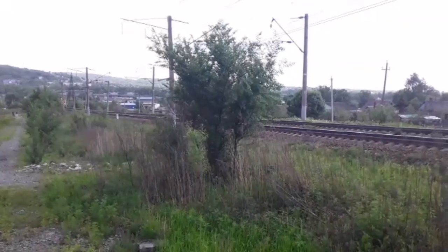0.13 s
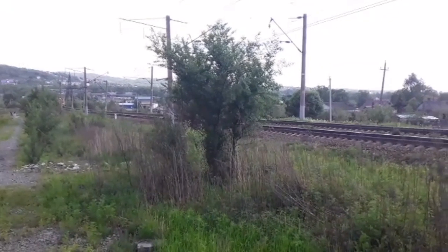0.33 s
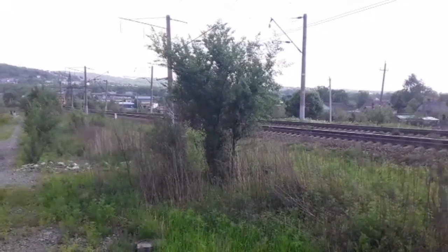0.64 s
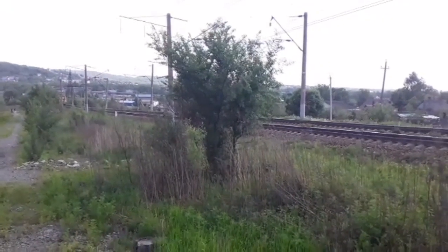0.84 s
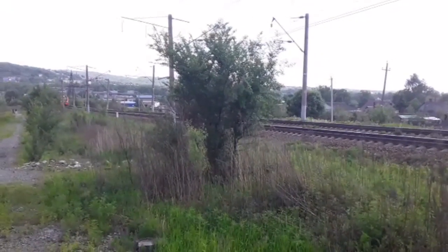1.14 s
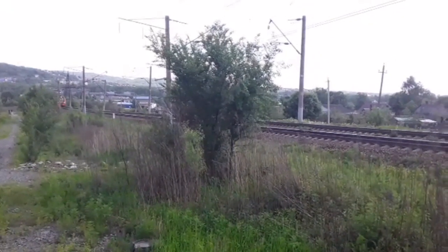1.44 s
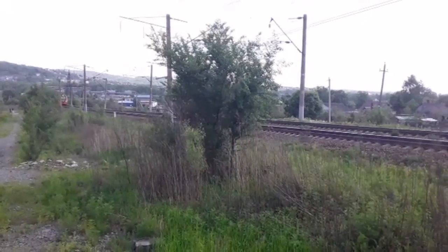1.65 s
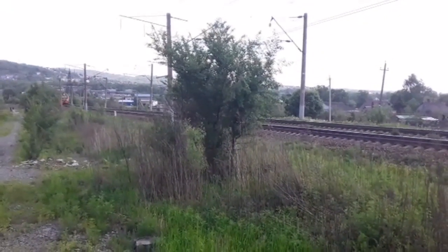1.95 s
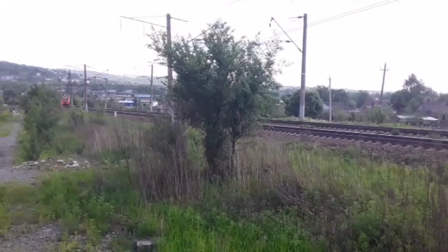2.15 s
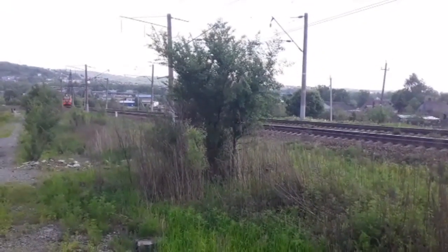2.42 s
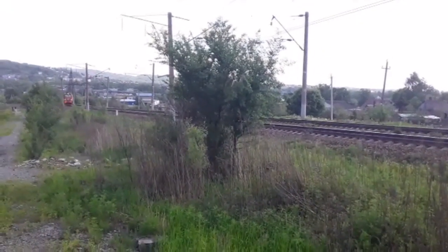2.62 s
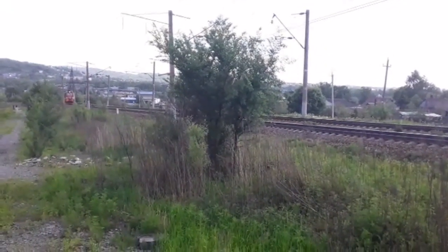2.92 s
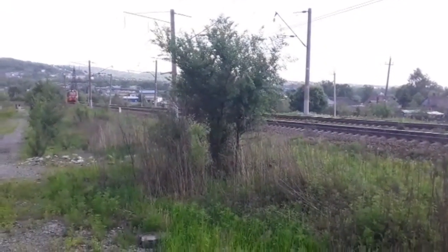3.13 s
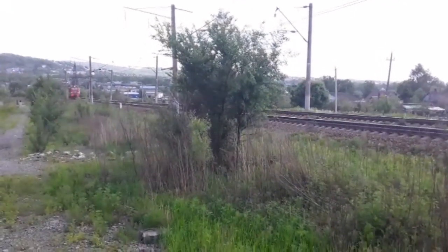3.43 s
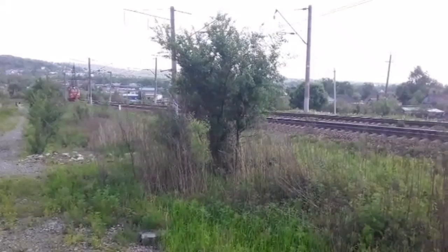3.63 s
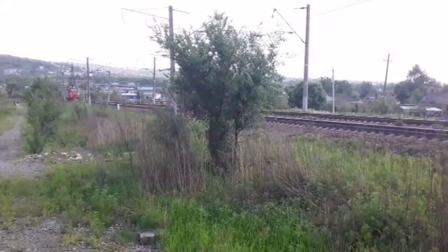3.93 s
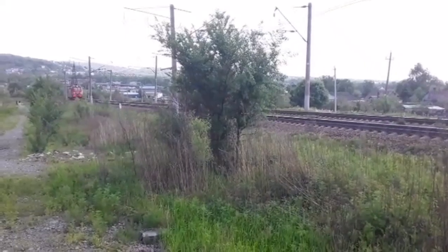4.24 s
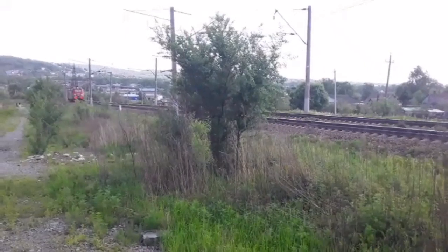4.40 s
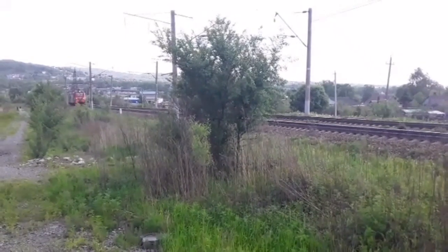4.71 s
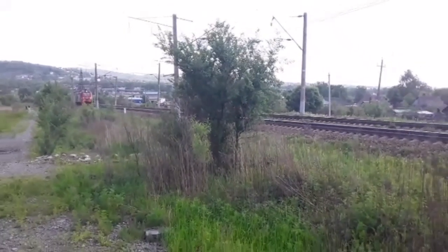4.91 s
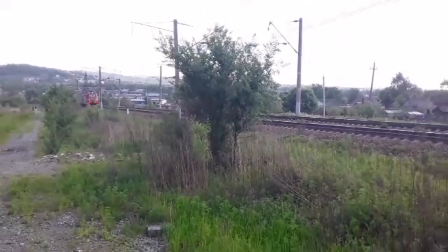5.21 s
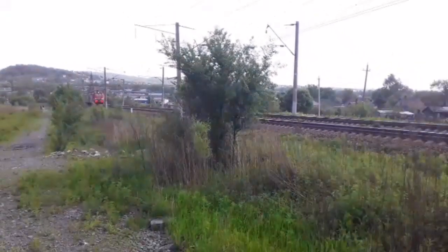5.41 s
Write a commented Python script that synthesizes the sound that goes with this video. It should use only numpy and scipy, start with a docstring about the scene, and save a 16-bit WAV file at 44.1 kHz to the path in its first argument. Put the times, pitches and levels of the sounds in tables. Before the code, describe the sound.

A steady low rumble of distant traffic and a faint chorus of far birds run throughout, in an open outdoor space. For the first second, a small bird gives quick, high twitters. From about 1 to 3 seconds, short high trills mix with nasal chips, hoarse little rasps and falling whistles. A rapid run of piping notes follows from 3 to 3.7 seconds, then thin, sharp chirps crowd together and grow louder until about 5.2 seconds. A few soft low bumps come and go on the microphone. The handheld camera's body gives a sharp, close click at about 4.7 seconds and a louder one at 5 seconds, both standing well above the birds. Two lower trills finish at around 5.3 to 5.5 seconds, with a faint, brief wavering tone far away.

```python
"""Quick, high twitters are heard first, over a far chorus and the rumble of a distant town. Small songbirds
in bushes beside an open railway line go on with rasps, trills, nasal chips, whistles and piping notes.
Each voice is a tone, or a stack of harmonics, modulated in frequency and amplitude and reflected by ground
and scrub; the traffic is broadband noise. The body of a hand-held camera ticks in damped modes, soft low
bumps come and go, and a faint far tone sounds near the end."""
import sys
import numpy as np
from scipy import signal
from scipy.fft import rfft, irfft
from scipy.io import wavfile
from scipy.ndimage import map_coordinates

SR = 44100
rng = np.random.default_rng(int(sys.argv[2]) if len(sys.argv) > 2 else 0)


def file_out(sig):
    """Save sig as 16-bit WAV at sys.argv[1]."""
    # one column per channel
    cols = np.atleast_2d(sig).T
    # limit, then scale
    lim = np.clip(cols, -1, 1)
    pcm = np.round(lim * 32767).astype(np.int16)
    wavfile.write(sys.argv[1], SR, pcm)


N = 245195

# traffic spectrum: f/Hz, relative spectral density/dB
TRAFFIC_SPECTRUM = [(15, -55), (30, -14.5), (60, -6), (87, 2), (187, -6.5), (304, -4), (546, -10),
                    (820, -5), (1200, -8.5), (2220, -17), (3500, -20.5), (5200, -25), (6500, -34.5),
                    (8550, -42), (11000, -50), (12500, -58)]
# traffic swell: t/s, level/dB
TRAFFIC_SWELL = [(0.0, -49), (2.01, -47), (2.68, -47), (3.36, -46.5), (3.83, -48), (4.69, -47),
                 (5.06, -46.5), (5.26, -47), (5.56, -46.5)]
# far machinery: f/Hz, level/dB, bandwidth/Hz
MACHINE_HUMS = [(620.8, -63.5, 12), (84, -60.5, 21)]
# twitters: t/s, rise/ms, shoulder f/Hz, arch/ms, top f/Hz, rise level/dB, drop level/dB
TWITTER_NOTES = [(0.0163, 8.8, 4970, 8, 7200, -44.5, -54), (.049, 13.4, 4820, 5.9, 6700, -40, -46),
                 (.130, 8.1, 5050, 7.4, 6900, -43, -51), (.162, 12, 4880, 9, 6500, -41.5, -46.5),
                 (.193, 8, 5200, 6, 6500, -60, -62), (0.253, 9.2, 4750, 6.8, 7200, -43, -53),
                 (.285, 14, 4820, 4.5, 6200, -40.5, -45), (.367, 8, 5180, 7.5, 6600, -40, -45),
                 (.400, 13.7, 4720, 5.4, 6500, -36.5, -47), (.480, 8, 5020, 6.8, 6800, -37.5, -43),
                 (0.5119, 15.3, 4730, 5.4, 6300, -37.5, -47), (.576, 6.5, 5000, 6, 6200, -56, -60),
                 (.602, 9, 5080, 8.6, 6700, -40.5, -51), (.636, 12.7, 4730, 9.3, 6900, -37.5, -46),
                 (0.7311, 9, 5150, 8.7, 6800, -43, -43), (.767, 12.7, 4890, 5.6, 6300, -43.5, -45),
                 (0.847, 8.7, 5280, 8.6, 7400, -51, -53), (.882, 11, 4930, 10, 6900, -42.5, -55),
                 (.923, 11, 4660, 5.6, 7000, -61, -62), (.970, 9, 5620, 8, 7000, -55, -62),
                 (1.013, 13, 4800, 7, 7000, -57, -60)]
# reflections from ground, bushes and embankment: delay/ms, level/dB
REFLECTIONS = [(3.6, -12), (21, -21.5), (64, -20)]
# hoarse calls of further birds: t/s, length/ms, start f/Hz, end f/Hz, spread/Hz, level/dB
RASP_NOTES = [(.035, 23, 6140, 6040, 1540, -55), (.138, 16, 7200, 7700, 400, -66),
              (.612, 27, 2610, 2420, 300, -51.5), (.683, 15, 4240, 4600, 400, -41),
              (.806, 13.6, 4480, 4750, 300, -41.5), (.871, 14, 4100, 4600, 300, -41),
              (1.247, 36, 5980, 4700, 250, -52.5), (1.425, 51, 6800, 5800, 890, -57),
              (1.730, 44, 3850, 3500, 715, -51.5), (1.897, 41, 5590, 5230, 700, -50.5),
              (1.960, 47, 4720, 4420, 400, -53.5), (2.050, 44, 5780, 5600, 500, -53.5),
              (2.470, 30, 3850, 3300, 400, -50.5), (2.467, 17.4, 4600, 5300, 400, -44.5),
              (2.529, 13, 4150, 4460, 250, -45), (2.589, 14, 3900, 4400, 250, -47),
              (2.661, 15, 4470, 4900, 300, -42), (2.745, 53, 5700, 6080, 1000, -55),
              (2.930, 39, 6170, 6100, 700, -56.5), (4.000, 43, 7270, 4980, 600, -53),
              (4.195, 39, 7000, 5370, 600, -58), (4.408, 40, 7060, 5100, 597, -56),
              (5.209, 33, 6400, 5280, 800, -56.5)]
# snaps in the camera body: t/s, level/dB, low-mode gain/dB, top-mode gain/dB, ring time factor
SNAPS = [(.2262, -46.5, -10, 3, 1.01), (4.6518, -11, -13.5, 0.5, .6), (4.8474, -35.5, -25, 10.5, 1.01),
         (5.0454, -15, -15, 3, 1.01), (5.047, -7.5, 5.5, 4, .99), (5.5512, -43.5, -20, 8, 1.01)]
# modes of the camera body: f/Hz, level/dB, nominal ring time/ms
BODY_MODES = [(1050, 0, 2.8), (2280, -4, 3.05), (4640, -1.5, 2.5), (5660, -1, 1.9), (7570, -9, 3.1)]
# trills: t/s, length/ms, start f/Hz, middle f/Hz, end f/Hz, level/dB, pulse rate/Hz, swing/Hz,
# gap depth (0-1), ground echo/dB, softness of onset and end (0-1)
TRILL_NOTES = [(0.344, 38, 5700, 6500, 5720, -54, 230, 502, 0.3, -14, 0),
               (.440, 35, 5600, 6500, 5870, -53.5, 160, 500, 0.35, -12, 0.2),
               (1.364, 41, 7400, 7100, 6370, -35, 85, 500, 1, -14, 0.5),
               (1.779, 41, 7100, 7080, 6850, -38, 90, 398, 0.95, -6, 0.57),
               (2.206, 34, 7060, 6930, 6200, -38, 104, 400, 0.96, -7, 0.5),
               (2.561, 35, 5250, 6220, 5430, -47, 185, 600, 0.44, -10, 0),
               (2.656, 34, 5550, 6070, 5580, -47, 170, 450, 0.4, -12, 0.1),
               (2.800, 32, 5500, 6060, 5530, -46.5, 185, 500, 0.4, -12, 0.2),
               (5.276, 76, 3520, 4740, 3050, -34, 85, -150, 1, -15, 0.65),
               (5.407, 94, 3240, 4650, 3770, -35, 89, -150, 0.91, -8, 0.99)]
# single whistled glides: t/s, length/ms, start f/Hz, end f/Hz, level/dB
GLIDE_NOTES = [(.3576, 12, 4620, 5400, -46.4), (.4227, 8, 3780, 5280, -51), (.6247, 22, 4170, 5440, -48),
               (.7706, 10, 4320, 6900, -55), (.698, 8.3, 5000, 6860, -56), (.9866, 15, 4080, 5960, -49.5),
               (1.068, 30, 5660, 5500, -54), (1.163, 12, 5000, 6900, -54), (1.174, 17, 3900, 5700, -49.5),
               (1.358, 6.1, 5000, 6500, -51), (1.368, 14, 3680, 5100, -55), (1.383, 45, 5000, 4180, -57),
               (1.4897, 50, 2810, 2960, -54), (2.538, 22, 5180, 4700, -51), (2.944, 22, 5050, 4600, -56),
               (2.946, 24, 4380, 3520, -48.5), (3.3252, 34, 5130, 4630, -52), (3.835, 22, 5300, 4800, -56),
               (3.9759, 8, 5920, 7420, -54), (4.032, 5.4, 5340, 5370, -47), (4.121, 10.8, 4450, 7160, -47),
               (4.2078, 8, 6070, 6570, -54), (4.218, 5, 7920, 4720, -51.3), (4.33, 8, 5060, 6560, -48.5),
               (4.3467, 18, 4920, 4300, -47.5), (4.35, 22, 5300, 5300, -62), (4.4286, 9.4, 5300, 5400, -47),
               (4.5321, 8, 7200, 7500, -57), (4.5518, 18, 5560, 7130, -47), (4.582, 11, 6500, 6770, -51.3),
               (4.676, 13, 4900, 4390, -45.5), (4.6825, 20, 6330, 3970, -43.2),
               (4.7117, 21, 5400, 4400, -48), (4.9714, 20, 6310, 6610, -59), (5.374, 19, 6600, 7130, -58.5)]
# low bumps: t/s, level/dB, f/Hz
LOW_BUMPS = [(1.028, -42.5, 123), (1.969, -42, 82.6), (3.139, -41, 88.8), (4.063, -45, 86),
             (5.277, -39.5, 127), (5.428, -44, 99.6)]
# nasal chips: t/s, length/ms, fundamental's start f/Hz, its end f/Hz, level/dB
CHIP_NOTES = [(1.050, 44, 947, 890, -46), (1.187, 37, 948, 876, -44.5), (1.495, 25, 916, 915, -49),
              (1.615, 19, 930, 900, -49), (1.896, 30, 935, 896, -43), (2.014, 56, 920, 903, -48.5),
              (2.330, 28, 936, 894, -48)]
# partials of a chip: harmonic number, level/dB
CHIP_HARMONICS = [(3, -18), (4, -15), (5, -3), (6, -6.5), (7, -10.5), (8, -18.5)]
# long whistles: t/s, length/ms, start f/Hz, end f/Hz, level/dB, bend, lateness of swell (both 1 = even)
WHISTLE_NOTES = [(1.545, 92, 5550, 4400, -53, 1.35, 1.5), (1.690, 75.6, 5220, 4780, -49, 1.25, 2.5),
                 (2.178, 90, 5540, 4590, -49.5, 1, 1.24), (2.787, 72, 4300, 2930, -45, 1.8, 0.55),
                 (2.968, 60, 4250, 3040, -46.5, 1.5, 0.86), (3.120, 93, 5530, 4820, -52.5, 1.1, 1.1),
                 (3.245, 78, 5520, 4580, -53, 1.3, 1.3), (4.262, 77, 5440, 4780, -52.5, 1.4, 1),
                 (4.380, 70, 5380, 4600, -54.5, 1.7, .9)]
# piping notes: t/s, final f/Hz, level/dB
PIPE_NOTES = [(3.071, 3750, -53), (3.117, 3600, -49), (3.168, 3530, -49.5), (3.226, 3500, -55),
              (3.283, 3480, -50.5), (3.329, 3400, -48), (3.384, 3480, -52.5), (3.441, 3500, -49),
              (3.493, 3400, -48.5), (3.551, 3450, -47.5), (3.602, 3450, -49), (3.668, 3400, -51),
              (4.925, 3400, -52.5), (4.988, 3300, -54), (5.094, 3400, -54), (5.142, 3400, -54),
              (5.195, 3400, -52), (5.248, 3350, -50), (5.355, 3500, -56)]
# motifs, one glide a row: delay/ms, length/ms, start f/Hz, end f/Hz, level/dB
TSIP_MOTIF = [(0, 5.07, 3900, 6500, 0.5), (4, 5.8, 6500, 4300, 0), (0, 4.3, 5900, 8300, -13),
              (5.5, 6, 8400, 5000, -13), (7, 4.5, 6100, 6100, -5)]  # up and straight down again
DOUBLE_MOTIF = [(0, 36, 5350, 4500, 0), (5, 50.3, 4450, 3620, -4)]  # two voices falling side by side
RISE_MOTIF = [(0, 11.3, 5900, 6450, 0), (8.5, 8.3, 6300, 8200, -12)]
DROP_MOTIF = [(0, 4.8, 6450, 4250, 0), (4, 5.6, 6200, 3940, -9.5), (3, 8, 8600, 4800, -21)]
# entries of each motif: t/s, level/dB, frequency shift/Hz
TSIP_ENTRIES = [(3.1942, -42.5, 0), (3.3234, -45, -150), (3.4507, -41.5, -100), (3.5673, -41, 100),
                (3.6776, -43, -50), (3.7844, -43, 50)]
DOUBLE_ENTRIES = [(3.508, -54, -100), (3.7784, -49.5, 100), (3.938, -49, -1), (4.114, -47.5, -50)]
RISE_ENTRIES = [(3.913, -48, 0), (4.057, -45.5, 30), (4.468, -43, -100), (4.6052, -35.5, 150),
                (4.7457, -40.5, 30), (5.096, -36.5, 100)]
DROP_ENTRIES = [(3.931, -40, 50), (3.9552, -41, 100), (4.074, -39, 200), (4.099, -39, -100),
                (4.486, -36.5, 30), (4.512, -37, -50), (4.5415, -45, 0), (4.6205, -35.5, 100),
                (4.646, -33, -100), (4.674, -39, -250), (4.7623, -34, 150), (4.7873, -35, -100),
                (4.8159, -45, -100), (4.8256, -41.5, -300), (5.1128, -38, 350), (5.1367, -33, 100),
                (5.169, -45.5, 400), (5.178, -45, 30)]
# low chirps of a further bird: t/s, level/dB, nominal f/Hz
CHIRP_NOTES = [(3.2251, -46.5, 2770), (3.748, -45.5, 2740), (4.0544, -46.5, 2690), (4.0886, -49, 2600),
               (4.221, -47.5, 2390), (4.2557, -46, 2495), (4.2784, -45, 2640), (4.3176, -51, 2980),
               (4.3784, -46.5, 2420), (4.53, -44, 2910), (4.5625, -50, 2580)]
# course of the far tone: t/s, f/Hz, level/dB
FAR_TONE_COURSE = [(5.22, 1250, -67), (5.242, 1294, -53), (5.276, 1267, -49), (5.286, 1367, -51.5),
                   (5.424, 1285, -52), (5.458, 1314, -45), (5.48, 1232, -68)]


def undb(db):
    """Amplitude ratio of a level in decibels."""
    return 10 ** (np.asarray(db) / 20)


def level(x, db):
    """Scale a signal to an rms level."""
    return x * undb(db) / np.sqrt(np.mean(x ** 2))


def add(out, s, x):
    """Superposition: add a short sound at s seconds."""
    i = max(int(s * SR), 0)
    out[i:i + len(x)] += x[:N - i]


def ramp(ms):
    """Normalised time, 0 to 1, over a note."""
    return np.linspace(0, 1, int(ms * SR / 1000))


def breath(u, softness):
    """Half-sine envelope; a larger exponent softens both ends."""
    return np.sin(np.pi * u).clip(0) ** softness


def walk(rate):
    """Random modulation: interpolation between rate Gaussian values a second."""
    knots = rng.standard_normal(4096)
    return map_coordinates(knots, [np.arange(N) * rate / SR + .5], order=3 if rate < 50 else 1, mode="wrap")


def sing(out, unsteady, s, hz, gain, waver_hz=45, flutter_db=2.0):
    """Phase is the integral of frequency: add a tone with random frequency and amplitude modulation."""
    waver, flutter = unsteady[:, (int(s * SR) + int(hz[0]) + np.arange(len(hz))) % N]
    phase = 2 * np.pi * np.cumsum(hz + waver_hz * waver) / SR
    add(out, s, gain * undb(flutter_db * flutter) * np.sin(phase))


def traffic(band_octaves=.4):
    """Incoherent sources sum to noise: the bands of distant traffic flicker separately under one swell."""
    f = np.fft.rfftfreq(N, 1 / SR)[1:]
    hz, db = np.transpose(TRAFFIC_SPECTRUM)
    colour = undb(np.interp(np.log(f), np.log(hz), db))
    out = 0
    for octave in np.arange(4, 14.4, band_octaves):
        share = np.cos(np.pi / 2 * np.clip((np.log2(f) - octave) / band_octaves, -1, 1))
        noise = irfft(np.r_[0, rfft(rng.standard_normal(N))[1:] * colour * share], N)
        out = out + noise * undb(1.12 * walk(6))
    swell_db = np.interp(np.arange(N) / SR, *np.transpose(TRAFFIC_SWELL))
    return level(out, swell_db)


def machinery(waver_db=2.5):
    """Resonance: noise confined to narrow bands is heard as far, wavering hums."""
    out = np.zeros(N)
    for hz, db, width in MACHINE_HUMS:
        gain = undb(db + waver_db * walk(3.01))
        resonance = signal.butter(2, [hz - width / 2, hz + width / 2], "band", fs=SR, output="sos")
        out += gain * level(signal.sosfilt(resonance, rng.standard_normal(N)), 0)
    return out


def chorus(out, unsteady, count=1400):
    """Air absorption grows with frequency: of many far birds' short glides, the high ones are weaker."""
    when, pitch, slope, length, strength = rng.random((count, 5)).T
    hz = 3600 + 3600 * pitch ** 1.4
    slide_hz = 2600 * (slope - .5)
    db = -64 + 7 * strength - (hz - 4500) / 350
    glides(out, unsteady, np.c_[when * N / SR, 4 + 12 * length ** 2, hz - slide_hz, hz + slide_hz, db])


def twitters(out, unsteady):
    """Frequency sweeps: a rise, loudest as it passes about 4450 Hz, then a thin arch and a steep drop."""
    rise_from_hz, drop_from_hz, drop_to_hz, drop_ms = 3150, 5800, 2610, 5.02
    loudest_hz, loud_width_hz, arch_gain = 4450, 620, undb(-59)
    for s, rise_ms, shoulder_hz, arch_ms, top_hz, db, drop_db in TWITTER_NOTES:
        u, v, w = ramp(rise_ms), ramp(arch_ms), ramp(drop_ms)
        bent = min(rise_ms / 26, 1)  # the longer a rise, the more it levels off
        still_to_rise = (1 - bent) * (1 - u) + bent * (1 - u) ** 3.4
        rise_hz = shoulder_hz - (shoulder_hz - rise_from_hz) * still_to_rise
        foot_hz = shoulder_hz + (drop_from_hz - shoulder_hz) * v
        arch_hz = foot_hz + (top_hz - (shoulder_hz + drop_from_hz) / 2) * np.sin(np.pi * v)
        drop_hz = drop_from_hz + (drop_to_hz - drop_from_hz) * w
        swell = np.exp(-((rise_hz - loudest_hz) / loud_width_hz) ** 2)
        rise_gain = undb(db) * swell * breath(u, .3) + arch_gain * u ** .3
        drop_gain = undb(drop_db) * breath(w, .7) + arch_gain * (1 - w)
        gain = np.r_[rise_gain, np.full(len(v), arch_gain), drop_gain]
        sing(out, unsteady, s, np.r_[rise_hz, arch_hz, drop_hz], gain)


def outdoors(x, scrub_db=-11, scrub_t60_s=0.2):
    """Reflection and scattering: a few distinct echoes and a thin tail from leaves and stems."""
    t = np.arange(int(.5 * SR)) / SR
    tail = rng.standard_normal(len(t)) * undb(-60 * t / scrub_t60_s) * (1 - np.exp(-t / 0.002))
    response = tail * undb(scrub_db) / np.sqrt(np.sum(tail ** 2))
    for ms, db in [(0, 0.013)] + REFLECTIONS:  # the direct sound comes first
        add(response, ms / 1000, undb([db]))
    return signal.fftconvolve(x, response)[:N]


def rasps(out, unsteady):
    """Wide, rapid random frequency modulation blurs a tone into a hoarse band."""
    for s, ms, hz0, hz1, spread_hz, db in RASP_NOTES:
        u = ramp(ms)
        sing(out, unsteady, s, hz0 + (hz1 - hz0) * u, undb(db) * breath(u, 0.71), waver_hz=spread_hz)


def ticks():
    """Hand-damped modes of snapping plastic: low ones ring on a firm snap, the top one on a thin snap."""
    out, t = np.zeros(N), np.arange(400) / SR
    for s, db, low_db, top_db, ring in SNAPS:
        for (hz, mode_db, ms), snap_db in zip(BODY_MODES, (low_db, low_db, 0, 0, top_db)):
            age = 1.32 * np.log(1000) * 1000 * t / (ms * ring)  # in time constants
            envelope = undb(db + mode_db + snap_db) * age * np.exp(1 - age)
            add(out, s, envelope * np.sin(2 * np.pi * hz * t))
    # so small a part radiates no bass, and the casing dulls the top
    return signal.sosfilt(signal.butter(2, [300, 9500], "band", fs=SR, output="sos"), out)


def trills(out, unsteady, duty=0.61, ground_ms=4.2):
    """Periodic modulation swings and pinches an arched tone once a pulse; hard ground reflects it."""
    for s, ms, hz0, hz_mid, hz1, db, rate, swing_hz, gap, echo_db, soft in TRILL_NOTES:
        u = ramp(ms)
        arch_hz = hz0 + (hz1 - hz0) * u + 4 * u * (1 - u) * (hz_mid - (hz0 + hz1) / 2)
        phase = rate * u * ms / 1000 % 1
        pulse = breath(np.clip(phase / duty, 0, 1), 0.84)
        gain = undb(db) * (1 - gap * (1 - pulse)) * breath(u, soft)
        hz = arch_hz + swing_hz * np.cos(2 * np.pi * (1 + 0.29 * gap ** 2) * phase)
        sing(out, unsteady, s, hz, gain)
        sing(out, unsteady, s + ground_ms / 1000, hz, undb(echo_db) * gain)


def glides(out, unsteady, notes):
    """Linear frequency sweeps, each under a rounded breath."""
    for s, ms, hz0, hz1, db in notes:
        u = ramp(ms)
        sing(out, unsteady, s, hz0 + (hz1 - hz0) * u, undb(db) * breath(u, 0.68))


def bumps(ms=45):
    """Tone bursts: a few cycles of low pressure swing, perhaps wind on the microphone."""
    out, u = np.zeros(N), ramp(ms)
    for s, db, hz in LOW_BUMPS:
        add(out, s, undb(db) * breath(u, 1) * np.sin(2 * np.pi * hz * u * ms / 1000))
    return out


def chips(out, unsteady):
    """A harmonic series on a missing, falling fundamental sounds nasal; higher partials decay first."""
    for s, ms, hz0, hz1, db in CHIP_NOTES:
        u = ramp(ms)
        for k, partial_db in CHIP_HARMONICS:
            gain = undb(db + partial_db) * breath(u ** 0.5, 1) * np.exp(-.25 * k * u)
            sing(out, unsteady, s, k * (hz0 + (hz1 - hz0) * u), gain, waver_hz=120, flutter_db=4.5)


def whistles(out, unsteady):
    """Power-law sweeps downward, most of them steepening, a little roughened by distance."""
    for s, ms, hz0, hz1, db, bend, late in WHISTLE_NOTES:
        u = ramp(ms)
        gain = undb(db) * breath(u ** late, 0.65)
        sing(out, unsteady, s, hz0 + (hz1 - hz0) * u ** bend, gain, waver_hz=75, flutter_db=2.5)


def pipes(out, unsteady, ms=22.5, fall_hz=602, bend=2.23):
    """Decelerating sweeps: each note falls quickly, then settles on its final frequency."""
    u = ramp(ms)
    for s, hz, db in PIPE_NOTES:
        sing(out, unsteady, s, hz + fall_hz * (1 - u) ** bend, undb(db) * breath(u, 0.55))


def motifs(out, unsteady):
    """Frequency translation: a group of glides recurs, shifted as a whole at each entry."""
    for motif, entries in ((TSIP_MOTIF, TSIP_ENTRIES), (DOUBLE_MOTIF, DOUBLE_ENTRIES),
                           (RISE_MOTIF, RISE_ENTRIES), (DROP_MOTIF, DROP_ENTRIES)):
        for s, db, shift_hz in entries:
            glides(out, unsteady, [(s + lag_ms / 1000, ms, hz0 + shift_hz, hz1 + shift_hz, db + part_db)
                                   for lag_ms, ms, hz0, hz1, part_db in motif])


def low_chirps(out, unsteady, ms=18, distance_db=-3):
    """Random frequency modulation roughens a further bird's short drops, blurred by distance."""
    u = ramp(ms)
    for s, db, hz in CHIRP_NOTES:
        sing(out, unsteady, s, hz * (1.1 - 0.176 * u), undb(db + distance_db) * breath(u, 1), waver_hz=497)


def far_tone(out, unsteady):
    """Inharmonic partials: a soft wavering tone and a weaker one at 1.4 times its frequency."""
    times, course_hz, course_db = np.transpose(FAR_TONE_COURSE)
    t = np.arange(times[0], times[-1], 1 / SR)
    hz = np.interp(t, times, course_hz)
    gain = undb(np.interp(t, times, course_db)) * np.hanning(len(t)) ** 0.21
    sing(out, unsteady, times[0], hz, gain, waver_hz=8)
    sing(out, unsteady, times[0], 1.4 * hz, undb(-5.5) * gain, waver_hz=9.6)


def scene(birds_db=0.5):
    """Linear superposition of the echoed birds, the town, the bumps and the ticks in one channel."""
    birds = np.zeros(N)
    unsteady = np.array([walk(450), walk(250)])  # modulators of frequency and of level
    glides(birds, unsteady, GLIDE_NOTES)
    for voice in (chorus, twitters, rasps, trills, chips, whistles, pipes, motifs, low_chirps, far_tone):
        voice(birds, unsteady)
    return (undb(birds_db) * outdoors(birds) + traffic() + machinery() + bumps() + ticks())[None]


def record(dry, bass_hz=30, top_hz=11200):
    """Band limiting: the microphone loses the deep bass and the camera cuts the top."""
    x = signal.sosfilt(signal.butter(2, bass_hz, "high", fs=SR, output="sos"), dry)
    return signal.sosfilt(signal.ellip(6, .5, 28, top_hz, fs=SR, output="sos"), x)


dry = scene()
out = record(dry)
file_out(out)
```